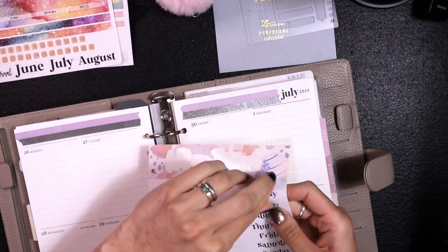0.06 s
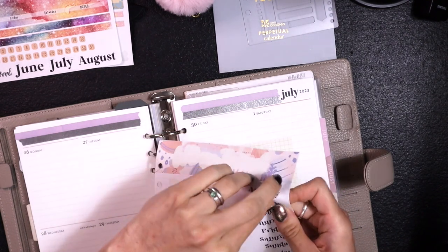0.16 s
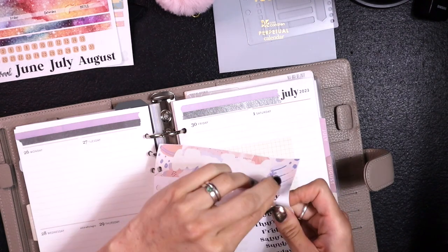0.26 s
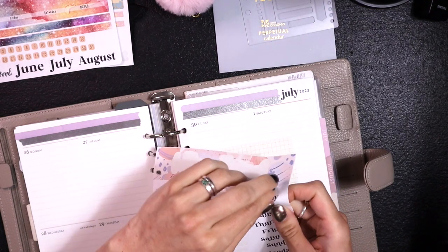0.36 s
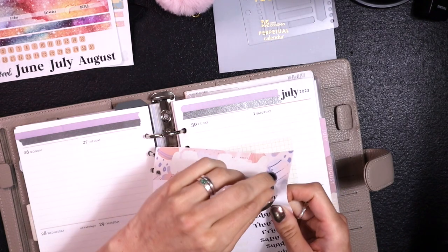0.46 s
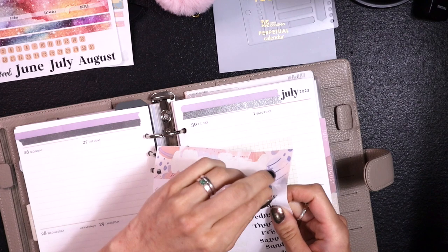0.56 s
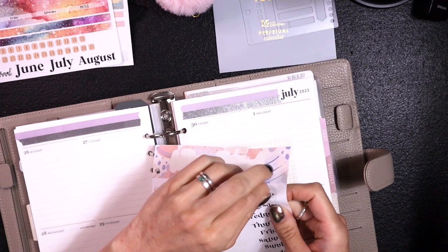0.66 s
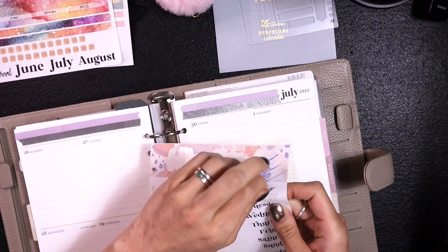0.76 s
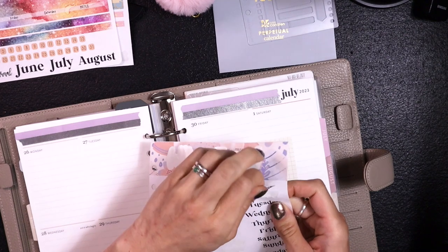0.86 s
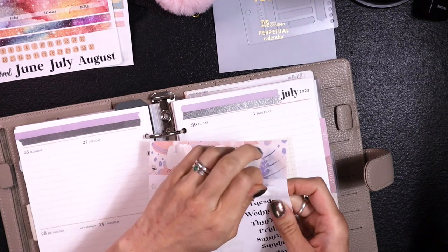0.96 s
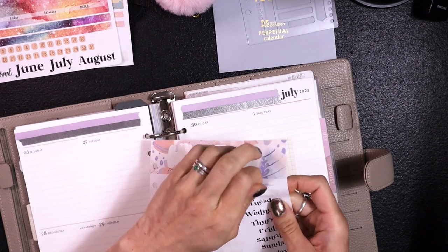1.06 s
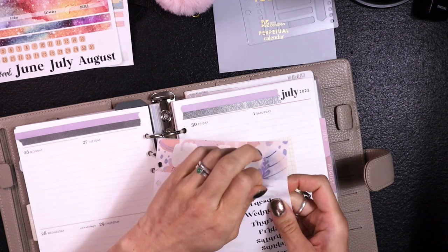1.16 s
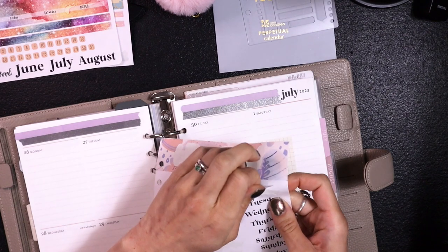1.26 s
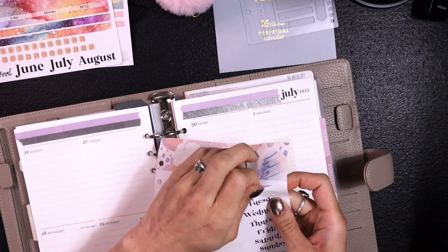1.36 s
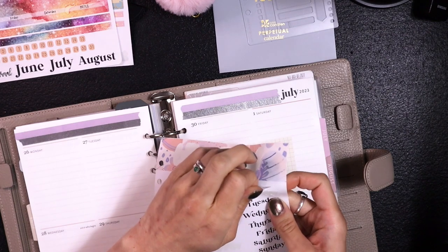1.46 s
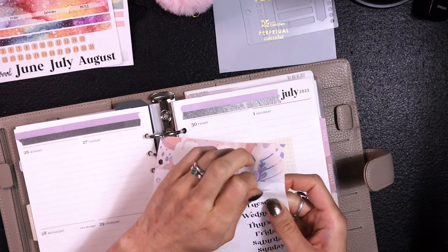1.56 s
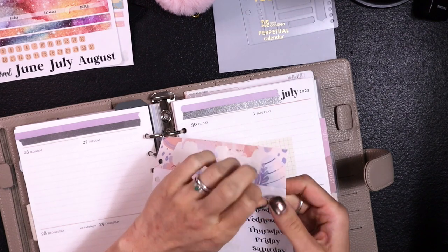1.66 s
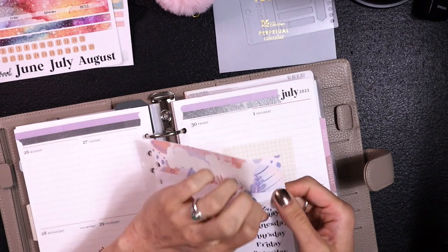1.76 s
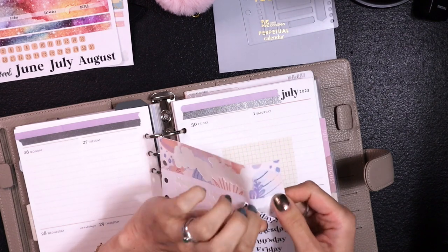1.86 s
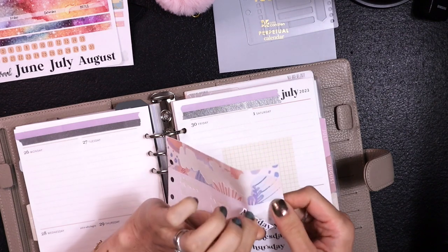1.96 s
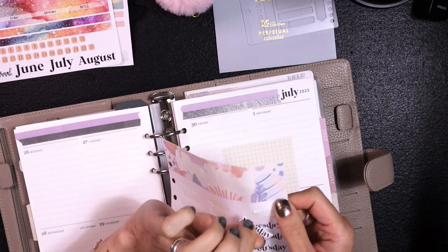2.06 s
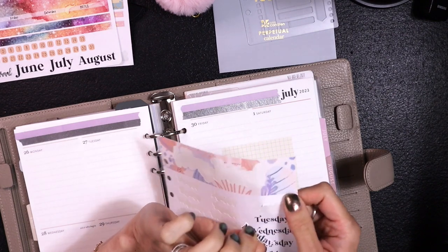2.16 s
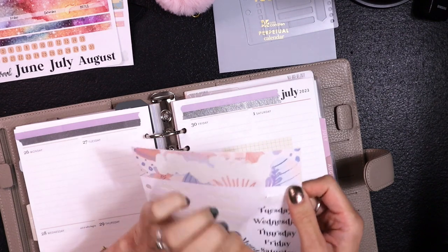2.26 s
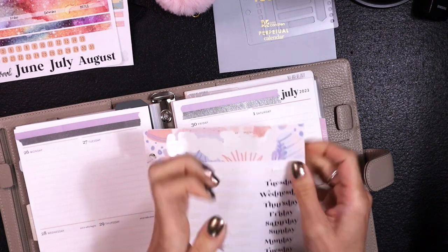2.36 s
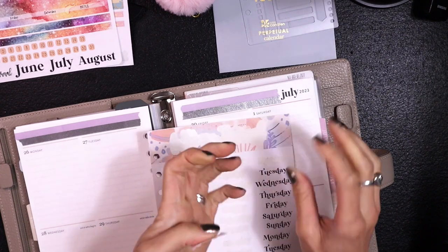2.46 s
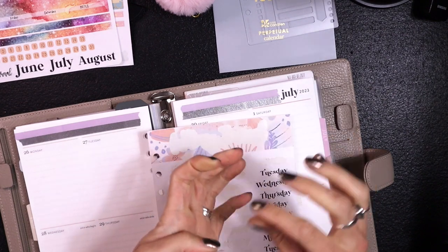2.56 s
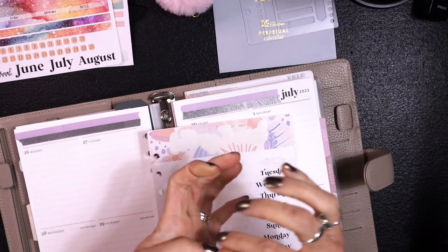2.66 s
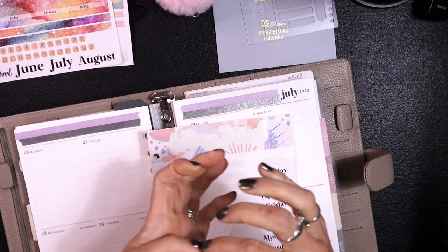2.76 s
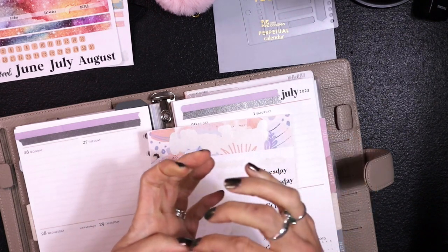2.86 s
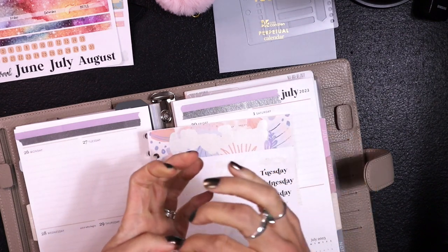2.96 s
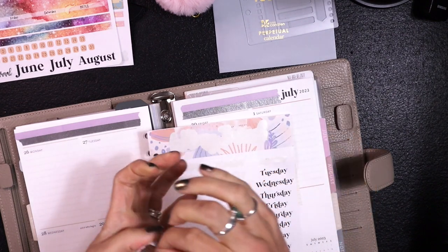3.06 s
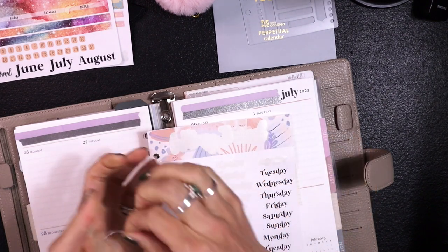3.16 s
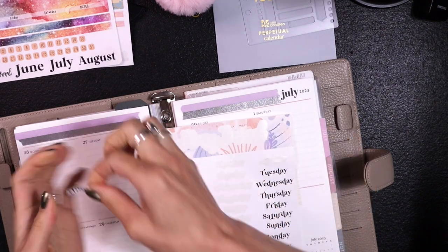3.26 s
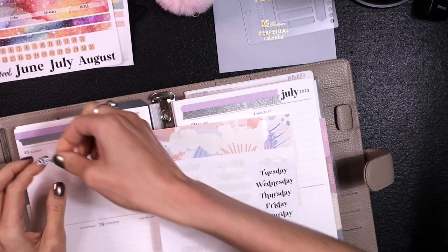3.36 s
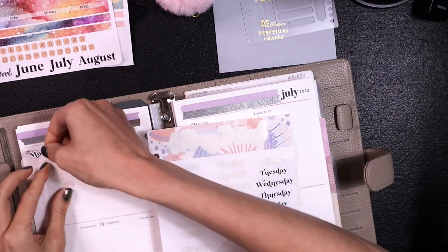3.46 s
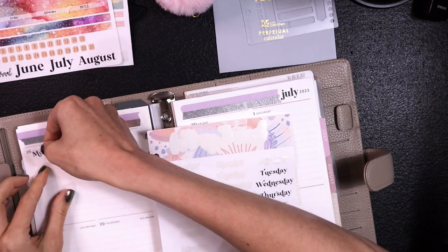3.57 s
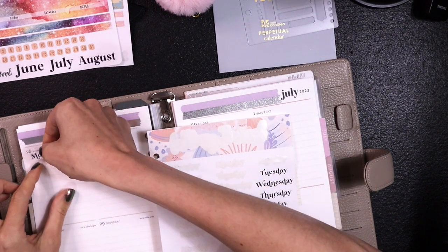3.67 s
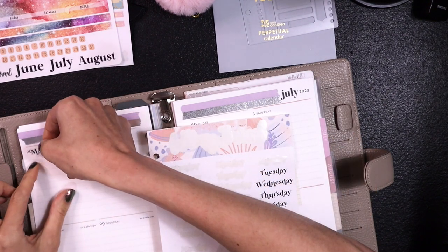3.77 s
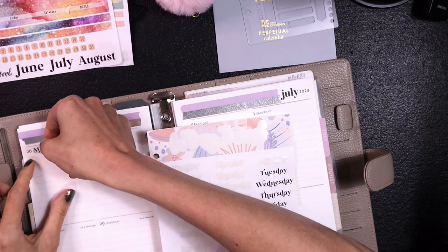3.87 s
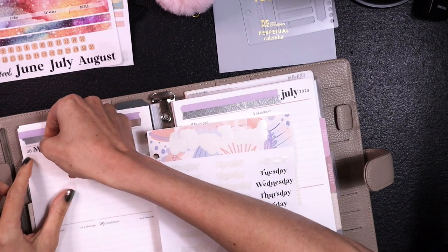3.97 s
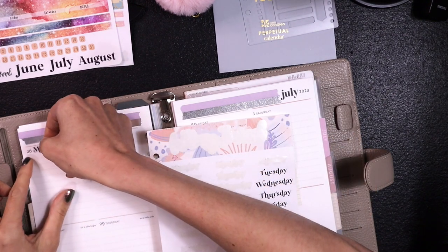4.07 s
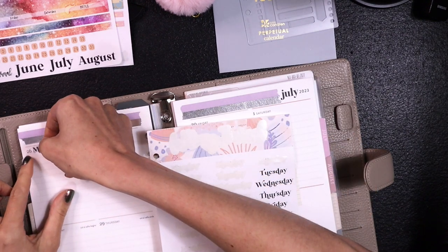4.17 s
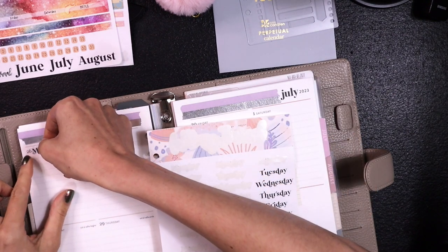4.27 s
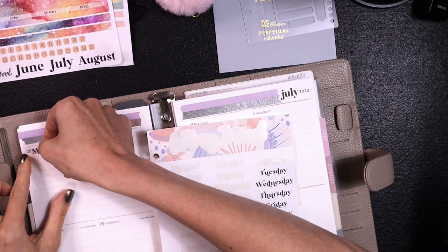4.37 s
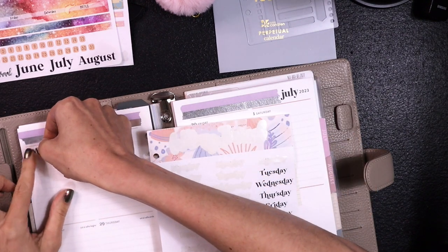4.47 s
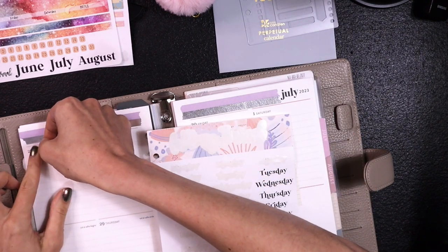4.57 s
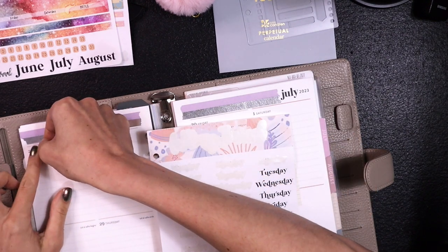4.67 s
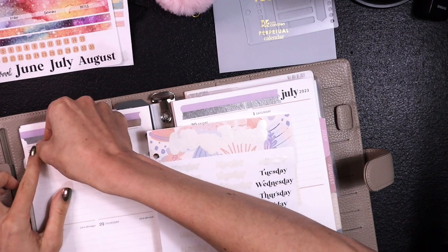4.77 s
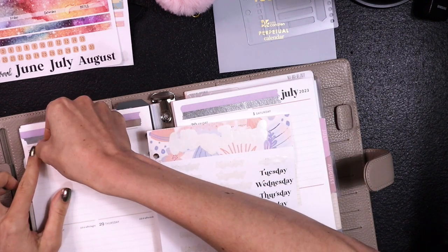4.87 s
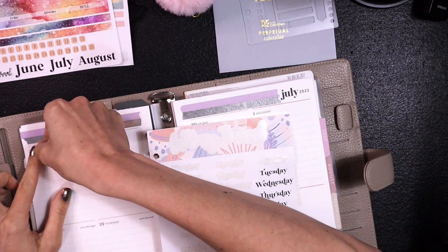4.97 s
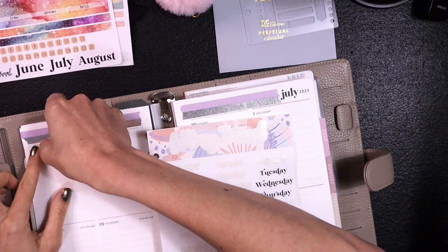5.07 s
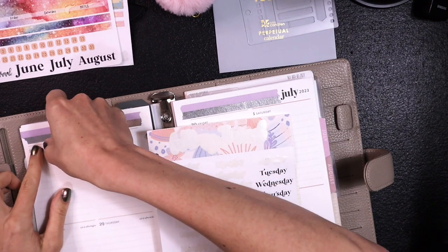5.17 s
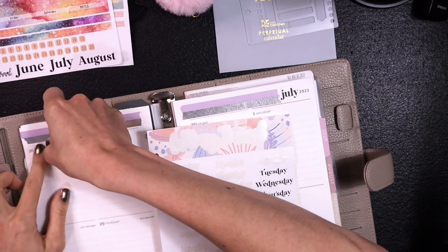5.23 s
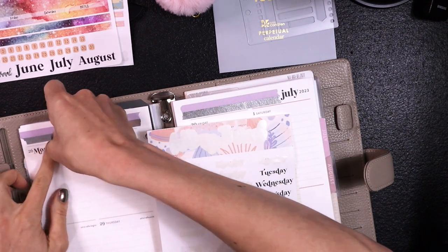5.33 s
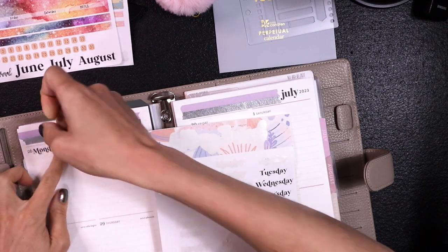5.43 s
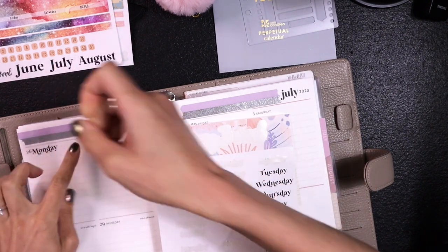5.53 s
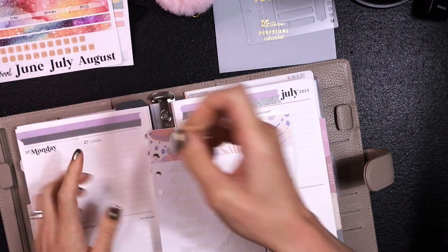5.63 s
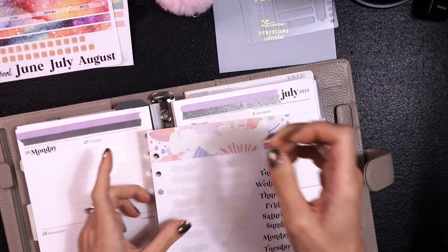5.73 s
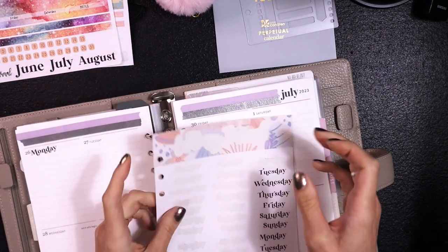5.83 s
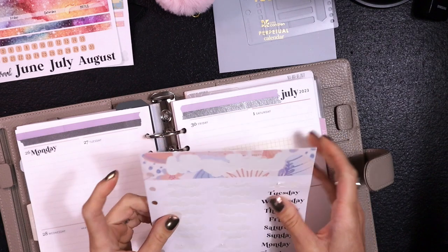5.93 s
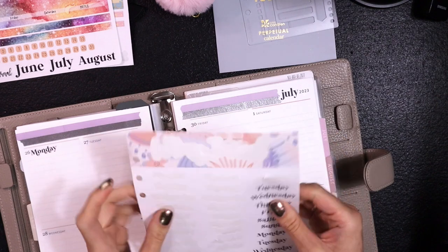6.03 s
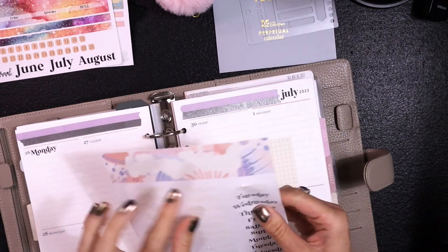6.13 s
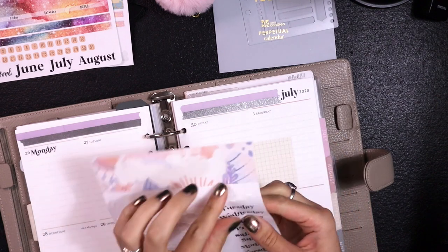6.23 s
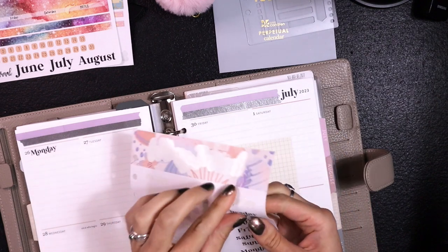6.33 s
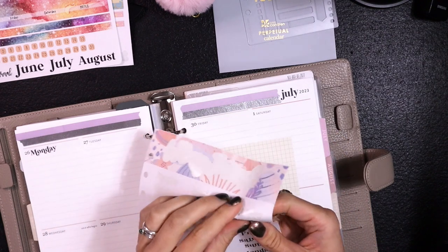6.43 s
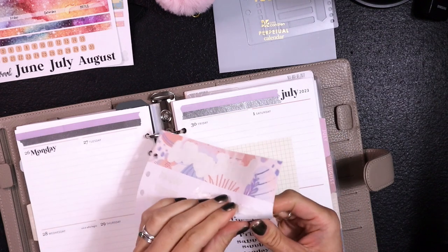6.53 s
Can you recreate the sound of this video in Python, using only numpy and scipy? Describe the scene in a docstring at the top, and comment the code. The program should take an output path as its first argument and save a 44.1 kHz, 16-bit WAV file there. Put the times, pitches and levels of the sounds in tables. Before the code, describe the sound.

Dry papery rustles, with creasing snaps and light knocks, come from fingers bending a stiff sheet close to a stereo microphone above a desk. An early crack is strong, later ones cluster, small glue ticks lead into a long quiet gap, then a crisp click and lively crinkling with hollow thumps. Short room reflections and soft, steady, wide hiss surround it.

```python
"""Grainy rustles of paper under the fingers, mixed throughout with snaps, knocks and hollow booms, over a wide
quiet hiss. Hands peel a sticker off its backing sheet and press it on a planner page, under a phone above the desk.
Rustle is dense random slips through paper resonances; each snap is a dying crackle ringing six groups of modes;
a bow is a push ringing two low modes. A small soft room answers with echoes that die band by band,
and the hiss is shaped steady noise with a thin whine, mostly in the sides."""
import sys
import numpy as np
from scipy import signal
from scipy.fft import rfft, irfft
from scipy.io import wavfile
from scipy.ndimage import uniform_filter1d

SR = 44100
rng = np.random.default_rng(int(sys.argv[2]) if len(sys.argv) > 2 else 0)


def unload_audio(sound):
    """Save the sound as a 16-bit wav file, at the path given as the first command line argument."""
    columns = np.transpose(np.atleast_2d(sound))
    # keep every value between -1 and 1, then stretch to whole-number steps
    steps = np.round(np.clip(columns, -1, 1) * 32767)
    wavfile.write(sys.argv[1], SR, steps.astype(np.int16))


N = 291060

# Steady background, middle and sides, before each is set to its RMS level: [f/Hz, relative level per Hz/dB]
HISS_MID = [(12, -30), (20, 0), (60, -0.5), (337, -6), (377, -7), (949, -11), (2600, -18), (2820, -20),
            (3250, -19.5), (6010, -29), (9670, -35), (13200, -51), (16000, -77)]
HISS_SIDE = [(12, -64), (20, -28), (96, -9.5), (241, -1), (1370, -7), (3070, -13.5), (8410, -26),
             (10200, -26.5), (11400, -30), (13900, -34.5), (16000, -61)]
HISS_MID_DB, HISS_SIDE_DB = -52, -48.5
WHINE_HZ, WHINE_DB = 9949, -72  # RMS level in the sides

# Handling of the sheet at changing levels, one list per slide:
# [t/s, paper body level/dB, finger hiss against body/dB]
SLIDES = [
    [(0, -53.5, -1), (0.11, -66.5, 0.5), (0.136, -53, -13), (0.166, -47.5, -3), (0.2, -51, 6),
     (0.24, -49.5, -2), (0.3, -49, -12.5), (0.33, -57, -13), (0.37, -50.5, -8.5), (0.42, -50, -13.5),
     (0.47, -63, -2)],
    [(1.53, -59, -13), (1.59, -61, -10), (1.615, -46, 0.5), (1.665, -48, -1.5), (1.69, -57.5, -2),
     (1.72, -46, -4), (1.75, -58, 4.5), (1.8, -49.5, 4), (1.84, -48.5, -9), (1.92, -54, -1.5),
     (2.05, -60, -4), (2.08, -58.5, 2), (2.18, -57, -2), (2.24, -73, 5)],
    [(5.27, -76, 6), (5.31, -63.5, 9), (5.39, -71.5, 7), (5.5, -68, 9), (5.56, -77, 7),
     (5.595, -47.5, -0.5), (5.625, -82, 1)],
    [(5.76, -80, 19), (5.84, -53.5, -3.5), (5.9, -49.5, -6.5), (5.95, -52.5, -7.5), (5.98, -53, 2.5),
     (6.04, -61, 7), (6.07, -65, 2), (6.085, -51.5, 6), (6.12, -58, -5), (6.17, -60.5, 2.5),
     (6.25, -57.5, 7), (6.33, -50.5, -0.5), (6.44, -52.5, -1), (6.5, -45.5, -1), (6.6, -56.5, 4)],
]
# Brushes of a finger at a steady level, brief or lingering:
# [start t/s, hold/s, paper body level/dB, finger hiss against body/dB]
BRUSHES = [(0.584, 0.069, -62.5, -0.5), (0.765, 0.13, -52.5, -11), (0.969, 0.12, -61, -8),
           (1.275, 0.05, -61, 0), (1.365, 0.0074, -56, -9), (2.263, 0.035, -56, -0.5),
           (2.385, 0.023, -62.5, 8.5), (2.56, 0.072, -69, -3), (2.731, 0.012, -59.5, 2),
           (2.812, 0.027, -73.5, 11), (3.143, 0.043, -62.5, 5.5), (3.268, 0.49, -75.5, 4.5),
           (5.102, 0.12, -68.5, 1.5), (6.106, 0.0064, -42.5, -11)]
BRUSH_ATTACK_S, BRUSH_RELEASE_S = 0.051, 0.051
BRUSH_EDGE_DB = 29  # how far a brush rises and falls
# Resonances of the sliding paper: its body, flap, rasp and finger hiss: [f/Hz, width/Hz, level/dB]
SLIDE_BODY = [(816, 830, 3.5), (1460, 1040, 12), (2020, 1630, 8)]
SLIDE_FLAP = [(384, 190, 0.62), (716, 340, 1.47)]
SLIDE_RASP = [(2820, 1200, 3.5), (4300, 5300, -8)]
SLIDE_HISS = [(4720, 3800, 2), (7400, 3800, 1), (10030, 2160, 5), (11660, 2900, -7)]
SLIDE_FLAP_DB, SLIDE_RASP_DB = -5.5, -1  # against the body; the rasp also follows the finger hiss
PATCH_DB, HISS_PATCH_DB, PATCH_PER_S = 3, 2, 70  # each resonance comes and goes on its own
FIBRE_PER_S, FIBRE_DB, FIBRE_SCATTER_DB = 250, -7.5, 2.5  # lone fibres catch while the paper slides

# Room answer by band: [f/Hz, t60/s, middle level/dB, side level/dB]
ROOM = [(160, 0.23, 2, -20), (483, 0.17, -5.5, -23), (1273, 0.18, -4.5, -9), (2640, 0.18, -11, -9),
        (4340, 0.17, -9.5, -4), (6360, 0.29, -12, -8.5), (10400, 0.1, -5.5, -0.5)]

# Snaps of creases, nails and glue: [t/s, crackle time to fall 20 dB/ms, crack level/dB,
# then against the crack: flap/dB, knock/dB, crisp/dB, fizz/dB;
# knock f/Hz, crack f/Hz, crisp f/Hz, left minus right/dB]
SNAPS = [(0.1737, 3.1, -29.5, -6.5, 5, -4.5, -2, 1570, 2270, 5570, 1),
         (0.1813, 5, -39, -5, 9, 2, 4, 1320, 2230, 5500, 4),
         (0.338, 4.5, -51, -14, 14, -7, -14, 1660, 2100, 6180, -1),
         (0.3632, 2.7, -50, -10, -3, 6, -3, 1400, 3200, 6500, 2),
         (0.4759, 3, -54, -10, -8, 8, 9, 1400, 3800, 5200, 0),
         (0.5882, 3, -58, -10, -8, 4, 8, 1400, 3800, 6500, 1),
         (0.6276, 2.7, -9.5, -44, -8.5, -4.5, -16, 1410, 3000, 5470, 1.5),
         (0.6453, 3.5, -34.5, -22, 6, -14, -3, 1310, 2950, 4650, -2),
         (0.767, 3.9, -32, -24, -7.5, -4.5, -10, 1300, 3180, 6900, 21.5),
         (0.8037, 3.5, -31, -11.5, -13, -1, -3, 1560, 2940, 5300, 6),
         (0.9582, 5.3, -41.5, -4, 7.5, 4.5, 4, 1470, 2100, 6330, -0.5),
         (1.31, 2.7, -44, 1, 4, 0, 0, 1220, 2880, 6270, 11),
         (1.324, 2.2, -37.5, 10.5, 18, -18, -22, 890, 2940, 4540, -0.5),
         (1.359, 4.6, -52, 5, -3, 15, 5.5, 1400, 2880, 6440, 14.5),
         (1.5263, 3.7, -42, -15, -19, -17, -28, 910, 3040, 4400, 4),
         (1.5678, 3.1, -27, -13, -3.5, 1.5, 4, 865, 2860, 6400, 2),
         (1.7618, 3.8, -29.5, -14, -6, 2.5, 6.5, 890, 2820, 6300, 9),
         (1.801, 8, -49.5, 3, -2, 13, 15, 1500, 3260, 5100, 14),
         (1.8184, 4.3, -36, 5, -6, -15, -20, 1500, 2190, 4410, 3),
         (1.822, 7, -33, 7, 4, -20, -30, 1500, 2190, 4410, -0.5),
         (1.8344, 5.1, -39.5, 4, 5, -10, -16, 810, 2680, 4760, 2),
         (1.8698, 7.2, -34.5, -16, -6, 0, 5.5, 1390, 2430, 6090, 2),
         (2.0663, 4.5, -43.5, -8, -16, -6, 1, 1320, 3800, 4400, 0),
         (2.0852, 4, -41, -13, -11, -2, -4, 1310, 3900, 7200, -6),
         (2.094, 3.5, -39, -10, 0, 7, 5, 1000, 3240, 5910, 0),
         (2.099, 7.4, -28, -13, -8, -13, -10, 1000, 3500, 4400, -1),
         (2.1048, 6.4, -25.5, 1.5, -1, -0.5, 7, 1650, 3700, 5500, 0.5),
         (2.108, 5.2, -15.5, -11, 1, -13, -23, 1640, 2410, 5200, 0),
         (2.1128, 4.8, -14.5, -2, -2.5, -8, -25, 980, 2240, 4600, 1.5),
         (2.332, 5, -52.5, 5, 6, 6, 11.5, 1440, 3270, 5620, 0.5),
         (2.4606, 2.5, -19, -14.5, -4.5, -8, -13, 1770, 2450, 4400, 1.5),
         (2.511, 6.1, -29.5, -10, 4, -3, -12, 1800, 2300, 4400, 1),
         (2.5137, 3.6, -43, -8, -6, 4, 3, 1500, 3300, 4600, -0.5),
         (2.5163, 4.1, -17, -9, -6.5, -5.5, -5, 1130, 2590, 4650, -1.5),
         (2.7075, 3, -62, -15, -15, 2, 12, 1400, 3800, 7200, 0),
         (2.7256, 4, -43, -18, -10, -1, 6, 1360, 2900, 7200, 1.5),
         (2.733, 3, -54, -15, -12, 8, 8, 1400, 3000, 7140, 0),
         (2.744, 4, -41, -15, -12, -5, -1, 1890, 2130, 7200, -3),
         (2.843, 5, -51, -5, -12, 5, 3, 1510, 3800, 6640, 3),
         (3.1406, 3.4, -35.5, -26, -23, 3, 15, 1570, 2630, 4920, 0),
         (3.168, 3, -49, -15, -15, 2, -2, 1400, 3900, 4400, 2),
         (3.1765, 3, -58, -15, -15, 6, 14, 1400, 3800, 7200, 1),
         (3.1793, 2.8, -40.5, -15, -12, 5, 15.5, 1480, 3440, 6080, -2.5),
         (3.1824, 6, -38, -9, -8, 2, 11, 1400, 2650, 6500, -1.5),
         (3.5081, 5.3, -44.5, 3.5, 2.5, 4, 6, 955, 3960, 4400, -2),
         (5.0721, 2.8, -27, -2.5, 1, 15.5, 6, 800, 3530, 4700, -6),
         (5.0728, 2.9, -29.5, -16, 5, 4, 19, 1690, 2570, 5450, -9),
         (5.0743, 1.9, -36.5, -13, 3, 11, 12, 1700, 3900, 4550, -1),
         (5.076, 2.7, -41, -7, -6, 6, 10, 1700, 3000, 6000, -9),
         (5.828, 2, -37, -2, 1, 3, 6.5, 1290, 2290, 6420, -1.5),
         (5.8818, 2.6, -30.5, -2, 3, -18, -30, 1140, 2260, 4400, -2),
         (5.9182, 2.3, -36.5, -6, 4, 3, -5, 1400, 3350, 4800, 1.5),
         (5.927, 2.3, -35.5, 3, 12.5, -7, -11, 1380, 2100, 5160, -5),
         (5.9775, 2.6, -38.5, 5, 13.5, 3, 5, 1190, 2100, 7160, 2),
         (5.988, 3.8, -24, 0, 4.5, -2.5, 1.5, 1220, 3470, 4400, 1),
         (6.006, 4.5, -40.5, 11.5, 4, -3, -2.5, 1000, 3770, 6540, -2),
         (6.0417, 2.4, -33.5, 11.5, 13.5, -19, -20, 1190, 2290, 6010, 0.5),
         (6.086, 5, -41, 8, 1, -4, -2, 1080, 2800, 5290, -1),
         (6.0995, 2.8, -31.5, -13, 2, 2, -3, 1310, 2890, 5750, 4),
         (6.1055, 5, -23, -10, 2, -4, -5, 1860, 2320, 4770, -0.5),
         (6.1089, 2.9, -8.5, -15.5, -3.5, -9, -14, 1800, 2690, 4700, 2),
         (6.1447, 3, -48, -9, -12, 7, 6, 1090, 2920, 5000, 3),
         (6.2756, 4.1, -30.5, 0, -1, -2, -3, 1510, 2100, 7200, 2.5),
         (6.286, 4.8, -41.5, 5, 7.5, -1, -5.5, 1130, 2100, 6390, -2),
         (6.2983, 4.9, -34.5, -15, 1, 2, -2, 1390, 2630, 4600, 1),
         (6.314, 4.6, -45.5, 0, 8.5, -8, -14, 1200, 2460, 4400, 0),
         (6.575, 4.1, -51.5, 5, 16, 2, 2, 1130, 3900, 4940, -3)]
# Modes a snap rings, in order desk, flap, knock, crack, crisp, fizz: [f/Hz, width/Hz, level/dB]
RINGS = [
    [(70, 59, -7.5), (131, 48, -2), (197, 116, -7.5)],
    [(307, 177, -3.5), (453, 240, -1.5), (630, 245, 2)],
    [(820, 350, 0.5), (1152, 230, 2), (1390, 1200, 9), (1900, 760, 12)],
    [(2225, 810, 5), (2610, 720, 0.5), (2876, 305, 2.5), (3425, 760, 5.5), (3716, 780, 4.5)],
    [(4650, 1300, 3), (5500, 2200, 1.5), (6580, 1700, 3)],
    [(8700, 2200, 1.5), (10380, 2100, 1), (11950, 2700, -1), (14400, 3000, -9)],
]
# Pitch of the fizz in the snaps over time, highest near 3.1 s: [t/s, f/Hz]
FIZZ_PITCH = [(0.2, 9700), (0.8, 10600), (1.3, 9600), (1.57, 11200), (1.85, 9800), (2.5, 9100),
              (2.75, 10100), (3.14, 11900), (3.18, 10200), (5.07, 10500), (5.8, 9500)]
# Own ring of the spot that gives way, for knock, crack, crisp:
# [level against its group/dB, time to fall 20 dB/cycles]
SPOT_RING = [(-6, 4.5), (-10, 10), (-11.5, 12)]
# Glue letting go in even, swelling runs of ticks: [first tick t/s, last tick t/s, crack level of the last/dB]
PEELS = [(3.11, 3.138, -50)]
# A hand lands and thumps the desk: [t/s, peak level/dB]
THUMPS = [(2.11, -39), (5.0706, -33), (5.829, -43.5), (5.984, -35.5), (6.084, -37), (6.107, -36),
          (6.149, -41), (6.276, -38.5)]
CLEAN_DB_PER_MS, CLEAN_MS = 2, 3.2  # the shorter the crackle, the more its first break stands out
DESK_DB = -25  # the desk moves with the flap, this much weaker
LAG_PER_DB = 0.97  # samples of delay between the microphone ports per dB of balance
TICKS_PER_PEEL, TICK_JITTER_S, TICK_SWELL_DB = 5, 0.00086, 11
TICK_FLAP_DB, TICK_KNOCK_DB, TICK_CRISP_DB, TICK_FIZZ_DB = -16, -14, 6, 7  # against the crack
TICK_MS, TICK_KNOCK_HZ, TICK_CRACK_HZ, TICK_CRISP_HZ = 3.5, 1400, 3800, 5500

# The loose sheet bows and booms: [t/s, peak level/dB]
BOWS = [(0.176, -37), (5.955, -41.5), (5.99, -31), (6.003, -37), (6.042, -29.5), (6.108, -23.5),
        (6.139, -43), (6.282, -31), (6.31, -39)]
# Hollow modes of the bowed sheet: [f/Hz, width/Hz, level/dB]
BOW_MODES = [(390, 90, 4), (451, 51, 4.5)]

TOP_HZ = 16500  # upper edge of the phone's passband


def undb(db):
    """Turn decibels into an amplitude factor."""
    return 10 ** (np.asarray(db) / 20)


def unit(x):
    """Scale to an RMS of 1."""
    return x / np.sqrt(np.mean(x ** 2))


def to_peak(x):
    """Scale each row to a peak of 1."""
    return x / np.abs(x).max(axis=-1, keepdims=True)


def ring(x, modes):
    """Sum steep resonances, each applied twice; neighbours swing in opposite sense to leave no holes between."""
    out = 0
    for k, (hz, width, db) in enumerate(modes):
        b, a = signal.iirpeak(hz, hz / width, fs=SR)
        once = signal.lfilter(b, a, x)
        out = out + (-1) ** k * undb(db) * signal.lfilter(b, a, once)
    return out


def grains(shape, scatter_db):
    """Noise whose samples have very uneven sizes: many tiny slips, a few big ones."""
    return rng.standard_normal(shape) * undb(scatter_db * rng.exponential(size=shape))


def walk(rate):
    """Random levels, a new one every 1 / rate s, slewed from one to the next; RMS 1."""
    k = int(SR / rate)
    steps = np.repeat(rng.standard_normal(N // k + 1), k)
    return unit(uniform_filter1d(steps, k)[:N])


def coloured(spectrum, db):
    """Steady noise of a given spectrum and RMS level."""
    hz, gain_db = np.transpose(spectrum)
    f = np.maximum(np.fft.rfftfreq(N, 1 / SR), 1)
    gain = undb(np.interp(np.log(f), np.log(hz), gain_db))
    noise = irfft(rfft(rng.standard_normal(N)) * gain, N)
    return undb(db) * unit(noise)


def hiss():
    """Steady background noise: bass in the middle, the rest wider than the speakers, with a thin whine."""
    whine = np.sqrt(2) * undb(WHINE_DB) * np.sin(2 * np.pi * WHINE_HZ * np.arange(N) / SR)
    mid = coloured(HISS_MID, HISS_MID_DB) + .05 * whine
    side = coloured(HISS_SIDE, HISS_SIDE_DB) + whine
    return np.array([mid + side, mid - side])


def contact():
    """Follow the finger on the paper: levels in dB of body and of hiss against it, from slides and brushes."""
    curves = []
    for slide in SLIDES:
        before = np.array(slide[0]) - [.02, 30, 0]  # 20 ms edges of 30 dB
        after = np.array(slide[-1]) + [.02, -30, 0]
        curves.append(np.vstack([before, slide, after]))
    for s, hold, db, hiss_db in BRUSHES:
        edge_db = db - BRUSH_EDGE_DB
        curves.append(np.array([(s - BRUSH_ATTACK_S, edge_db, hiss_db),
                                (s, db, hiss_db),
                                (s + hold, db, hiss_db),
                                (s + hold + BRUSH_RELEASE_S, edge_db, hiss_db)]))
    t = np.arange(N) / SR
    body, finger = 1e-12, 1e-12  # tiny floor keeps the logarithms finite
    for s, db, hiss_db in (c.T for c in curves):
        gain = undb(np.interp(t, s, db, left=-200, right=-200))
        body = body + gain
        finger = finger + gain * undb(np.interp(t, s, hiss_db))
    return 20 * np.log10(body), 20 * np.log10(finger / body)


def patchy(modes, patch_db):
    """Drive resonances with dense slips; each resonance swells and fades by itself. Two channels."""
    slips = grains((2, N), 1.75)
    out = 0
    for k, mode in enumerate(modes):
        swell = undb(patch_db * walk(PATCH_PER_S))
        out = out + (-1) ** k * swell * ring(slips, [mode])
    return unit(out)


def slides(flicker_db=1.5, body_width=0.24, hiss_width=0.58):
    """Skin and paper drag in dense slips through the sheet's body, rasp, flap and hiss bands; left and right."""
    sign = np.array([[1], [-1]])
    body_db, hiss_db = contact()
    body = patchy(SLIDE_BODY, PATCH_DB)
    rasp = patchy(SLIDE_RASP, PATCH_DB)
    flap = patchy(SLIDE_FLAP, PATCH_DB)
    finger = patchy(SLIDE_HISS, HISS_PATCH_DB)
    # a drier finger rasps as well as hisses
    body = body + undb(SLIDE_RASP_DB + hiss_db / 2) * rasp
    out = body[0] + body_width * sign * body[1] + undb(SLIDE_FLAP_DB) * flap[0]
    finger_gain = undb(hiss_db + flicker_db * walk(40))
    out = out + finger_gain * (finger[0] + hiss_width * sign * finger[1])
    catches = (rng.random(N) < FIBRE_PER_S / SR) * grains(N, FIBRE_SCATTER_DB)
    out = out + undb(FIBRE_DB) * unit(ring(catches, SLIDE_BODY + SLIDE_RASP))
    return out * undb(body_db + flicker_db * walk(60))  # the grip comes and goes


def room(x, gap_ms=0.82):
    """Dense echoes that die band by band, one tail for the middle and one for the sides."""
    t = np.arange(SR // 2) / SR
    tail = 0
    for hz, t60, mid_db, side_db in ROOM:
        noise = ring(rng.standard_normal((2, len(t))), [(hz, hz, 0)])
        echo = noise * np.exp(-np.log(1000) * t / t60)
        energy = t60 * SR / 14  # of the decay, so t60 does not change the level
        tail = tail + echo * undb([[mid_db], [side_db]]) / np.sqrt(energy)
    tail = tail * np.clip(t * 1000 / gap_ms, 0, 1) ** 2  # the echoes build up over the gap
    mid, side = signal.fftconvolve(x[None], tail, axes=1)[:, :N]
    return np.array([mid + side, mid - side])


def snap_rows():
    """List snaps, glue ticks and desk thumps as the same kind of break.

    Columns: t/s, fall/ms, crack/dB, desk, flap, knock, crisp, fizz/dB, knock, crack, crisp f/Hz, balance/dB."""
    rows = []
    for s, ms, crack, flap, *rest in SNAPS:
        rows.append((s, ms, crack, flap + DESK_DB, flap, *rest))
    pitches = TICK_KNOCK_HZ, TICK_CRACK_HZ, TICK_CRISP_HZ
    tick_levels = TICK_FLAP_DB + DESK_DB, TICK_FLAP_DB, TICK_KNOCK_DB, TICK_CRISP_DB, TICK_FIZZ_DB
    for first, last, db in PEELS:
        jitter = TICK_JITTER_S * rng.standard_normal(TICKS_PER_PEEL)
        for along, off in zip(np.linspace(0, 1, TICKS_PER_PEEL), jitter):
            s = first + along * (last - first) + off
            crack = db - TICK_SWELL_DB * (1 - along)
            rows.append((s, TICK_MS, crack, *tick_levels, *pitches, 0))
    for s, db in THUMPS:  # the desk rings, the other groups lie 60 dB below
        rows.append((s, TICK_MS, db - 60, 60, 0, 0, 0, 0, *pitches, 0))
    return np.array(rows)


def snaps(width=0.35, rise_ms=0.4, first_db=19.5,
          knock_off_db=17.5, crack_off_db=28, crisp_off_db=8, fizz_off_db=25):
    """Each snap is a short dying crackle that rings the six groups of modes; left and right."""
    rows, size = snap_rows(), 4096
    (s, fall_ms, crack_db, desk, flap, knock, crisp, fizz,
     knock_hz, crack_hz, crisp_hz, pan_db) = rows.T[:, :, None]
    fizz_hz = np.interp(s, *np.transpose(FIZZ_PITCH))

    ms = np.arange(size) / SR * 1000
    shape = (1 - np.exp(-ms / rise_ms)) * np.exp(-np.log(10) * ms / np.maximum(fall_ms, 1))
    crackle = grains((len(rows), 2, size), 3.15).transpose(1, 0, 2) * shape
    # the first break is the sharpest
    crackle[:, :, :1] = undb(first_db + CLEAN_DB_PER_MS * (CLEAN_MS - fall_ms))

    levels_db = desk, flap, knock, 0, crisp, fizz
    pitches_hz = 1, 1, knock_hz, crack_hz, crisp_hz, fizz_hz  # desk and flap favour no pitch
    off_pitch_db = 0, 0, knock_off_db, crack_off_db, crisp_off_db, fizz_off_db
    mid, side, sense = 0, 0, 1
    for k, (modes, db, pitch_hz, off_db) in enumerate(zip(RINGS, levels_db, pitches_hz, off_pitch_db)):
        rung = 0
        for hz, wide, mode_db in modes:
            # the spot that gives way favours the modes near its pitch: dB lost per octave away
            away = np.abs(np.log2(hz / pitch_hz))
            mode = to_peak(ring(crackle, [(hz, wide, 0)]))
            rung = rung + sense * undb(mode_db - off_db * away) * mode
            sense = -sense
        rung = to_peak(rung)
        if k in (2, 3, 4):  # knock, crack and crisp: the spot also rings at its own pitch
            spot_db, cycles = SPOT_RING[k - 2]
            turns = pitch_hz * ms / 1000
            spot = np.sin(2 * np.pi * turns) * np.exp(-np.log(10) * turns / cycles)
            spot_ring = signal.fftconvolve(crackle, spot[None], axes=2)[:, :, :size]
            rung = rung + undb(spot_db) * to_peak(spot_ring)
        both, apart = undb(crack_db + db) * to_peak(rung)
        # the higher the group, the more the two ports hear different parts of the sheet, a little apart in time
        mid = mid + both
        side = side + width * (k / 5) ** 2 * np.roll(apart, 3 + k, axis=1)

    out = np.zeros((2, N + size + 8))
    for start, balance_db, m, d in zip(s[:, 0], pan_db[:, 0], mid, side):
        lag = int(round(LAG_PER_DB * balance_db))
        for ear, sign in enumerate((1, -1)):
            i = int(start * SR) + max(-sign * lag, 0)  # the weaker port hears it later
            out[ear, i:i + size] += undb(sign * balance_db / 2) * (m + sign * d)
    return out[:, :N]


def bows():
    """A push on the loose sheet leaves a short hollow ring, in the middle."""
    size = 8192
    push = np.zeros(size)
    push[0] = 1
    boom = to_peak(ring(push, BOW_MODES))
    out = np.zeros(N + size)
    for s, db in BOWS:
        i = int(s * SR)
        out[i:i + size] += undb(db) * boom
    return out[:N]


def scene():
    """Hands on the paper close by, the room's answer to them, and the steady hiss."""
    hands = snaps() + slides() + bows()
    return hands + room(hands.mean(axis=0)) + hiss()


def record(dry):
    """The phone cuts the top with a steep low-pass filter."""
    top_cut = signal.ellip(8, .2, 70, TOP_HZ, fs=SR, output="sos")
    return signal.sosfilt(top_cut, dry)


dry = scene()
out = record(dry)
unload_audio(out)
```